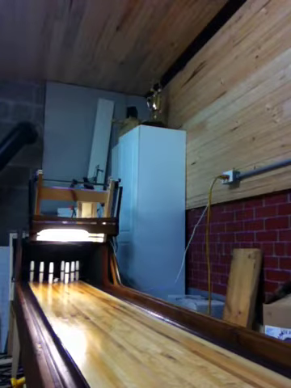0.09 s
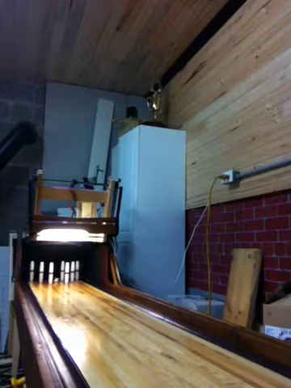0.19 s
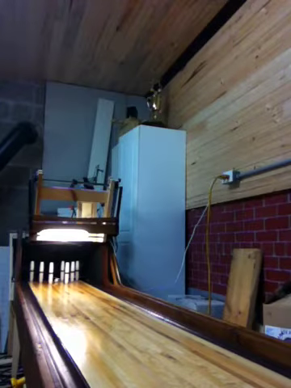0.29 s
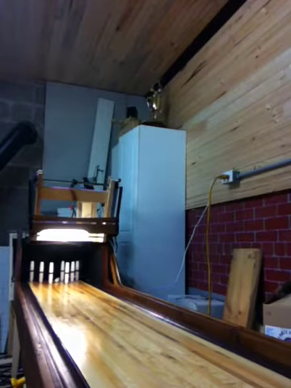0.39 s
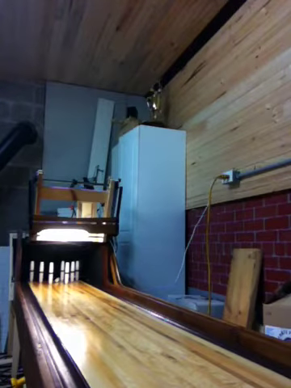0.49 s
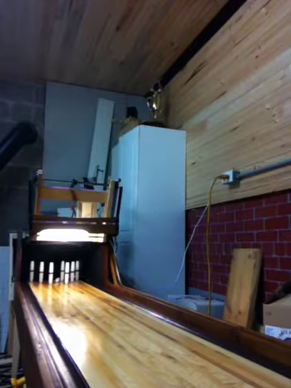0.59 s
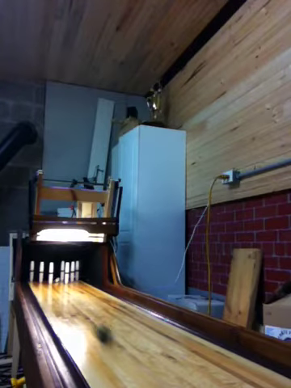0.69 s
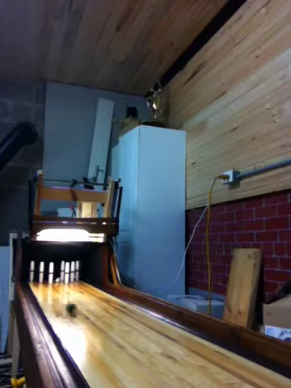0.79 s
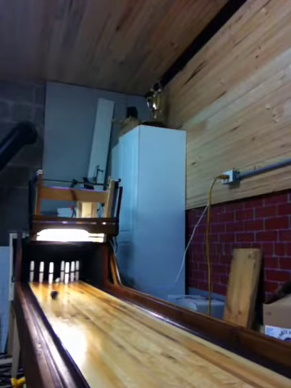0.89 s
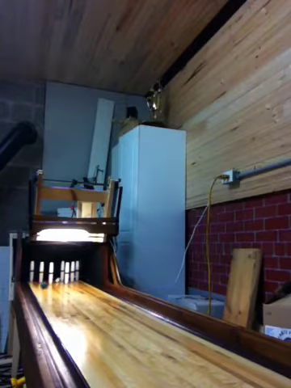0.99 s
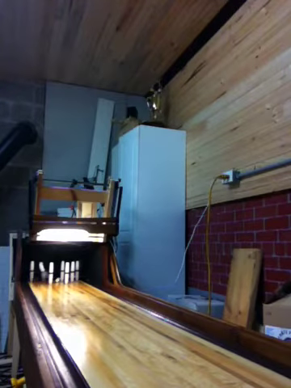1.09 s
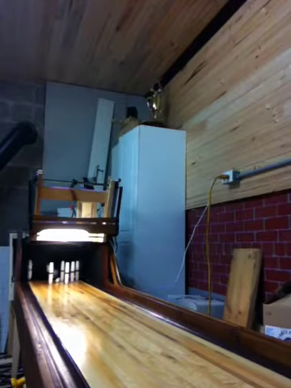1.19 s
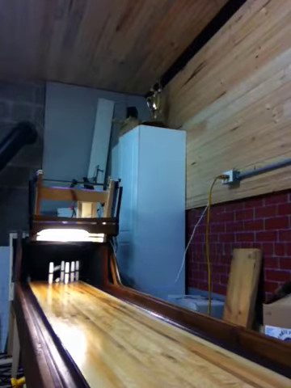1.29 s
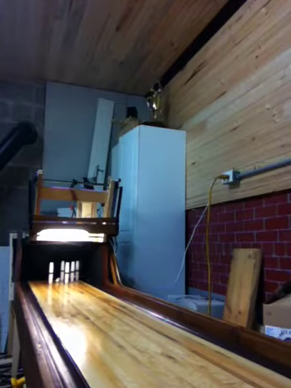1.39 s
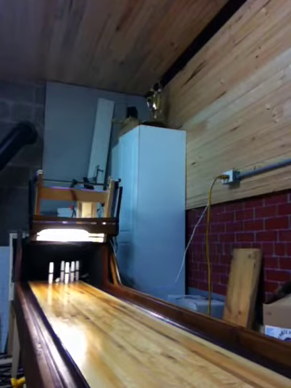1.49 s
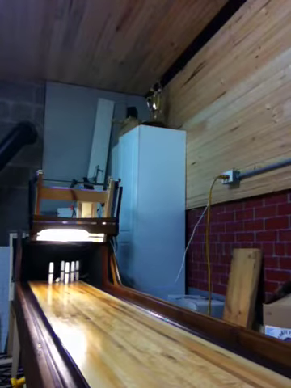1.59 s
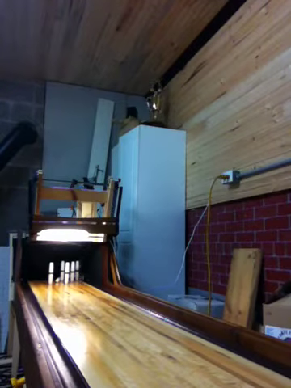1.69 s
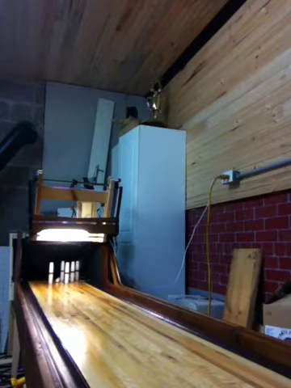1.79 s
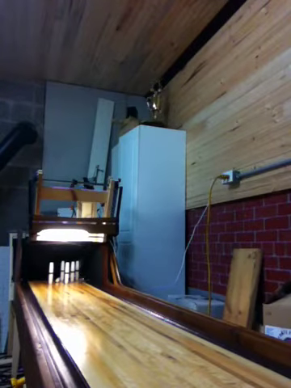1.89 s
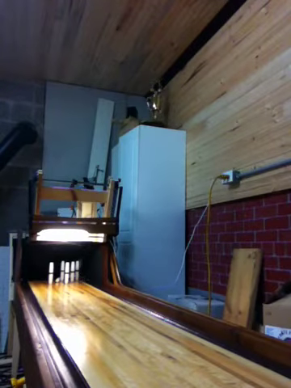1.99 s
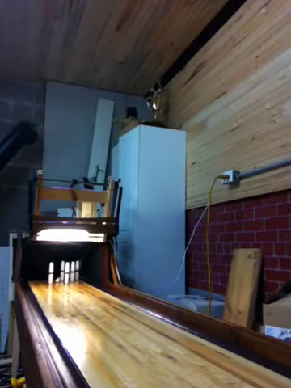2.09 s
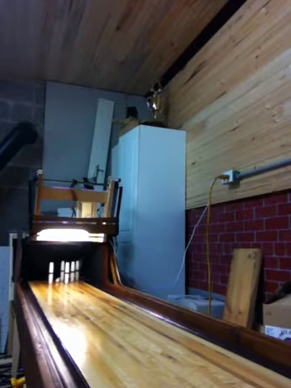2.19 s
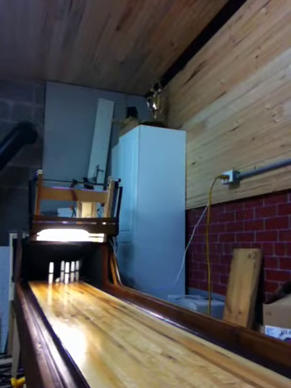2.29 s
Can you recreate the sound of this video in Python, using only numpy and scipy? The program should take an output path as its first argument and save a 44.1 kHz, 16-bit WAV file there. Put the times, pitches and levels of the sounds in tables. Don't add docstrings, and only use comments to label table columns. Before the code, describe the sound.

Mini bowling in a small wood-lined room: loud close knocks as the ball lands, a short rumbling roll, then a sharp pin crash, hollow wooden thuds and a fading rattle, with faint hiss underneath.

```python
import sys
import numpy as np
from scipy import signal
from scipy.fft import rfft, irfft
from scipy.io import wavfile
from scipy.ndimage import uniform_filter1d

SR = 44100
rng = np.random.default_rng(int(sys.argv[2]) if len(sys.argv) > 2 else 0)


def gain_from_decibels(decibels):
    exponent = np.asarray(decibels, float) / 20
    return 10 ** exponent


def master(y):
    cut = np.clip(np.atleast_2d(y).T, -1, 1)
    pcm = np.round(cut * 32767)
    wavfile.write(sys.argv[1], SR, pcm.astype(np.int16))


N = 103635

# (frequency [Hz], level [dB], t60 [s])
PIT_MODES = [(136, -15.5, 0.21), (246, -58, 0.18), (345, -8.5, 0.15), (373.4, -13.5, 0.21),
             (492, -9.5, 0.15), (578, -7, 0.17), (690, -10.5, 0.1), (743, -15.5, 0.24), (940, -18, 0.24)]


def ball():
    # (time [s], peak [dB], knock pitch [Hz], knock
    bounces = [(0.2444, -0.5, 1138, 3.47), (0.254, -13, 1460, 2.1), (0.2665, -7, 990, 1.7),
               (0.282, -14.5, 1460, 3.1), (0.291, -15.5, 1320, 2.6), (0.3429, -4, 1070, 5.3),
               (0.351, -13.5, 590, 2.5), (0.4058, -5, 1100, 1.8), (0.41, -11, 1250, 2.5),
               (0.4515, -11, 1060, 2.5), (0.49, -16, 1250, 5), (0.5165, -10, 850, 4),
               (0.5405, -16, 842, 3.5), (0.63, -13, 845, 3), (0.6495, -14, 826, 3.5), (0.56, -20, 830, 3.8),
               (0.602, -20, 1500, 3.1), (0.71, -20.5, 870, 2.5), (0.746, -37, 970, 3.9),
               (0.847, -16, 1030, 3.8), (0.858, -19.5, 1270, 8.6), (0.865, -12.5, 1200, 2.6),
               (0.882, -23.5, 980, 6.4), (0.898, -19, 1000, 2.4), (0.923, -26, 870, 3.8),
               (0.958, -24.5, 783, 8.8), (1.048, -23, 1220, 7.2), (1.066, -19.5, 1350, 7.3),
               (1.073, -16, 910, 4.5), (1.093, -12, 830, 5.9), (1.118, -14.5, 810, 5.4),
               (1.133, -14, 1110, 4.2), (1.152, -16, 1100, 5)]
    # (time [s], level [dB])
    roll_curve = [(.4, -25), (.56, -31), (.62, -31.5), (.68, -29.5), (.78, -28.5), (.87, -34.5),
                  (.95, -25.5), (1.02, -29), (1.07, -22.5), (1.17, -34), (1.29, -26)]
    # (frequency [Hz], level [dB])
    lane = [(50, -16), (100, -9), (330, -4.5), (1100, -2), (1700, -4), (3000, -18), (5000, -27.5),
            (12000, -49.5)]
    # (frequency [Hz], level [dB], t60 [s])
    lane_modes = [(96.3, -16.5, 0.38), (155.3, -26, 0.17), (200.8, -30, 0.36), (233, -28, 0.16),
                  (510, -54, 0.045), (830, -31, 0.078), (1070, -35, 0.052), (1450, -22, 0.036)]
    # (frequency [Hz], level [dB])
    rumble = [(50, -39), (100, -8), (330, -8.5), (950, 2), (1700, -8.5), (2600, -18), (5000, -29.5),
              (12000, -54)]
    board_db, board_fade_db_per_s, board_rise_s, board_s = -7, -6.5, 0.0015, 0.0088
    tick_db, tick_s = -56, 0.00032
    edge_fade_db_per_s, thump_fade_db_per_s = -0.5, -7.5

    boards, knocks, hits = np.zeros(N), np.zeros(N), np.zeros(N)
    t = np.arange(3000) / SR
    noise = rng.standard_normal((len(bounces), 2, len(t)))
    board_shape = np.minimum(t / board_rise_s, 1) * np.exp(-t / board_s)
    for (s, db, hz, cycles), (a, b) in zip(bounces, noise):
        shake = gain_from_decibels(board_db + board_fade_db_per_s * s) * colour(a * board_shape, lane)
        tick = gain_from_decibels(tick_db) * b * np.exp(-t / tick_s)
        add(boards, s, gain_from_decibels(db) * (shake + tick))
        add(knocks, s - .001, gain_from_decibels(db) * knock(hz, cycles, edge_fade_db_per_s * s))
        add(hits, s, gain_from_decibels(db + thump_fade_db_per_s * s) * np.ones(1))
    thump = signal.fftconvolve(hits, ring(lane_modes))[:N]

    size, level = bumps(roll_curve, rate=1100, spread_db=1.5)
    grain = evened(signal.fftconvolve(size, knock(970, 2.85))[:N])
    roll = 0.57 * level * (evened(colour(size, rumble)) + 0.11 * grain)
    return room(boards + thump + roll, wet_db=-0.5) + room(knocks, wet_db=-5)


def pins():
    # (time [s], peak [dB], scatter length [s], tilt [dB per octave])
    strikes = [
        (1.1675, -17.5, 0.0055, -4.5),
        (1.1712, -11, 0.0021, -2),
        (1.1740, -9.5, 0.0029, 1.5),
        (1.2010, -17, 0.0025, -4.5),
        (1.2045, -7, 0.0011, 0),
        (1.251, -44, 0.0035, 16),
    ]
    # (frequency [Hz], level [dB])
    struck = [(500, -29), (1100, -11), (1800, -3), (2500, -7.5), (6700, -9.5), (7400, -23), (10500, -48),
              (11500, -53), (15500, -77)]
    # (frequency [Hz], level [dB], t60 [s])
    struck_modes = [(1620, -27, 0.045), (2210, -15, 0.084), (3440, -10, 0.052), (4330, -6, 0.041),
                    (6920, -6, 0.2), (7240, -13, .12), (9600, -19, .15), (9740, -18, 0.12),
                    (12700, -39, .2)]
    # (time [s], peak [dB], scatter length [s], tilt [dB per octave])
    clack_events = [(1.3164, -13.5, 0.0056, 1), (1.3242, -7.5, 0.0034, -2), (1.386, -1.5, 0.0058, 2),
                    (1.409, 4, 0.0089, 6.5), (1.4177, 5, 0.0086, 5.5), (1.4377, -9, 0.0054, -8.5),
                    (1.4957, -11.5, 0.017, 3), (1.5304, -12, 0.019, 1), (1.545, -16, 0.017, -0.5),
                    (1.562, -31, 0.009, -7.5), (1.574, -17, 0.014, -1.5), (1.59, -21, 0.0063, -8),
                    (1.626, -24, 0.01, -6.5), (1.64, -22, 0.016, -3), (1.7452, -15, 0.0022, -2.5),
                    (1.7474, -8.5, 0.011, 5.5), (1.806, -26.5, 0.016, 1), (1.8367, -14.5, 0.015, 4),
                    (1.905, -24, 0.01, 1), (1.943, -20, 0.0073, 2.5), (2.0516, -29, 0.015, -5),
                    (2.0893, -31, 0.017, -3), (2.14, -29, 0.0097, -6)]
    # (frequency [Hz], level [dB])
    pin = [(88, -46.5), (150, -19), (930, 1.5), (1150, -7), (1320, 0), (5030, -12.5), (9000, -30),
           (14300, -57), (15500, -92)]
    # (frequency [Hz], level [dB], t60 [s])
    pin_modes = [(1840, -29, 0.018), (2290, 0, .04), (2910, 6, 0.028), (3840, -32, .04), (5100, -3, 0.01),
                 (5690, -8, 0.034)]
    # (time [s], peak [dB])
    clinks = [
        (1.904, -32),
        (1.91, -21),
        (1.918, -26.5),
    ]
    # (frequency [Hz], level [dB], t60 [s])
    clink_modes = [(1610, 1, 0.033), (1883, 0, 0.038), (3940, -6.5, 0.046)]
    # (time [s], level [dB])
    tumble_curve = [
        (1.36, -8.5),
        (1.45, -24.5),
        (1.6, -27.5),
        (1.72, -42),
        (1.8, -25),
        (1.97, -28.5),
        (2.03, -49),
        (2.1, -38),
        (2.4, -68),
    ]

    size, level = bumps(tumble_curve, rate=700, spread_db=2)
    box = evened(signal.fftconvolve(size, ring(PIT_MODES))[:N])
    tumble = 0.54 * level * (evened(colour(size, pin, tilt_db=-4.5)) + 0.32 * box)

    first = clacks(strikes, struck, struck_modes, ring_db=-15, rise_s=1 / SR)
    hard = clacks(clack_events, pin, pin_modes, ring_db=-16.5, rise_s=0.002)
    for s, db in clinks:
        add(hard, s, gain_from_decibels(db) * ring(clink_modes))
    return room(first, wet_db=-3.5) + room(hard + tumble, wet_db=-2.5)


def clacks(events, spectrum, body, ring_db, rise_s):
    detune = 0.0305
    flat = [(20, 0), (20000, 0)]
    out, t = np.zeros(N), np.arange(6000) / SR
    noise = rng.standard_normal((len(events), len(t)))
    tune = rng.uniform(-0.9, 1, len(events))
    for (s, db, length, tilt_db), a, d in zip(events, noise, tune):
        touch = a * np.minimum(t / rise_s, 1) * np.exp(-t / length)
        modes = ring(body, 1 + detune * d)
        rung = signal.fftconvolve(touch, modes / np.linalg.norm(modes))[:len(t)]
        clack = colour(touch, spectrum) + gain_from_decibels(ring_db) * rung
        add(out, s - .0005, gain_from_decibels(db) * colour(clack, flat, tilt_db))
    return out


def pit():
    # (time [s], peak [dB], knock pitch [Hz], boom [dB])
    thuds = [(1.251, -20.5, 1010, -8), (1.321, -8, 769, -19), (1.327, -17, 526, -13.5),
             (1.339, -14.5, 1060, -9), (1.392, -14.5, 887, -5), (1.411, -21, 556, -11),
             (1.535, -12.5, 546, -6.5), (1.57, -23, 940, -5), (1.629, -7.5, 1117, -45),
             (1.635, -7.5, 1038, -32), (1.7454, -15, 504, -12), (1.7525, -3, 925, -15.5),
             (1.764, -19.5, 833, -18), (1.806, -20, 504, 0.5), (1.836, -18.5, 476, -0.5),
             (1.945, -22.5, 670, -12), (1.962, -28.5, 690, 2), (2.051, -49, 603, -6),
             (2.068, -27, 940, -14), (2.141, -27.5, 582, -9), (2.201, -34.5, 780, -13),
             (2.28, -36.5, 596, 3)]
    # (time [s], peak [dB], pitch [Hz], length [cycles])
    hums = [(1.191, -33.5, 448, 40), (1.401, -34.5, 137.6, 20), (1.42, -20.5, 952, 39),
            (1.39, -22, 412, 11), (1.532, -14, 574.2, 18), (1.569, -25.5, 574, 30), (1.568, -22.5, 940, 34),
            (1.823, -24, 347, 9.8), (1.862, -24.5, 345, 22), (1.95, -22.5, 362, 7.6), (1.96, -36, 137, 4.8),
            (2.0, -31, 364, 11.3), (2.055, -24, 354.8, 17.7), (2.09, -26, 369, 9.4),
            (2.085, -42.5, 137, 10.6), (2.136, -36, 352, 4.9), (2.201, -34, 349, 18), (2.271, -38, 374, 14),
            (2.29, -41, 130, 5.4)]
    boom_s = 0.014
    out, shake, t = np.zeros(N), np.zeros(N), np.arange(3000) / SR
    noise = uniform_filter1d(rng.standard_normal((len(thuds), len(t))), size=20, axis=1)
    noise = noise - uniform_filter1d(noise, size=250, axis=1)
    for (s, db, hz, boom_db), a in zip(thuds, noise):
        add(out, s - .001, gain_from_decibels(db) * knock(hz, 5.74, edge_db=-0.5))
        soft = a * t * np.exp(-t / boom_s)
        add(shake, s, gain_from_decibels(db + boom_db) * soft / np.linalg.norm(soft) / 5)
    for s, db, hz, cycles in hums:
        add(out, s, gain_from_decibels(db) * knock(hz, cycles, edge_db=-60))
    boom = signal.fftconvolve(shake, ring(PIT_MODES))[:N]
    return room(out + boom, wet_db=-8)


def knock(hz, cycles, edge_db=0):
    # (ratio to the knock pitch, level [dB])
    partials = [(0.522, -13), (1.569, -8.5), (2.2, -18.5)]
    turns = np.arange(cycles * 3 / hz * SR) / SR * hz
    u = turns / cycles * 3
    tones = np.sin(2 * np.pi * turns)
    for ratio, db in partials:
        tones = tones + gain_from_decibels(db + edge_db) * np.sin(2 * np.pi * ratio * turns)
    return (u * np.exp(1 - u)) ** 2 * tones


def ring(modes, stretch=1):
    t = np.arange(SR // 3) / SR
    return sum(gain_from_decibels(db - 60 * t / t60) * np.sin(2 * np.pi * hz * stretch * t) for hz, db, t60 in modes)


def bumps(curve, rate, spread_db):
    s, db = np.transpose(curve)
    t = np.arange(N) / SR
    size = gain_from_decibels(spread_db * np.minimum(rng.exponential(1, N), 4))
    size = size * (rng.random(N) < rate / SR) * rng.choice([-1, 1], N)
    fade = np.clip(np.minimum(t - s[0], s[-1] - t) / .04, 0, 1)
    return size, gain_from_decibels(np.interp(t, s, db)) * fade


def colour(x, points, tilt_db=0):
    hz = np.abs(np.fft.fftfreq(2048, 1 / SR))
    octaves = np.log2(np.maximum(hz, 100) / 2000)
    log = np.log(gain_from_decibels(read(points, hz) + tilt_db * octaves))
    taps = np.fft.ifft(np.exp(log - 1j * signal.hilbert(log).imag)).real
    return signal.fftconvolve(x, taps[:1024] / np.linalg.norm(taps))[:len(x)]


def read(points, hz):
    f, value = np.transpose(points)
    return np.interp(np.log(hz + 1), np.log(f + 1), value)


def evened(x):
    return x / np.sqrt(np.mean(x ** 2) + 1e-20)


def add(mix, s, sound):
    part = mix[round(s * SR):][:len(sound)]
    part += sound[:len(part)]


def room(x, wet_db):
    # (frequency [Hz], t60 [s])
    decay = [(100, 0.23), (500, 0.59), (1500, 0.49), (4000, 0.46), (10000, 0.6)]
    gap_s = .006
    taps = np.zeros(SR)
    at = np.arange(0, SR - 20, 20) + rng.integers(0, 20, (SR - 1) // 20)
    taps[at] = rng.choice([-1., 1.], len(at))
    hz, t, z = signal.stft(taps, SR, nperseg=256)
    tail = signal.istft(z * gain_from_decibels(-60 * t / read(decay, hz)[:, None]), SR, nperseg=256)[1]
    tail = np.r_[np.zeros(round(gap_s * SR)), tail / np.linalg.norm(tail)]
    return x + gain_from_decibels(wet_db) * signal.fftconvolve(x, tail)[:N]


def air():
    # (frequency [Hz], level [dB])
    hiss = [(12, -45), (20, -32), (70, -5), (202, -8), (291, -6), (1080, -21.5), (6420, -23.5),
            (9480, -27.5), (15700, -35)]
    hz = np.fft.rfftfreq(N, 1 / SR)
    noise = rfft(rng.standard_normal(N)) * gain_from_decibels(read(hiss, hz))
    return gain_from_decibels(-59) * evened(irfft(noise, N))


def scene():
    return (ball() + pins() + pit())[None]


def top_cut(x):
    return signal.sosfilt(signal.butter(12, 15810, fs=SR, output="sos"), x)


def record(dry):
    limit, push_db, push_hz = .71, -28, 30
    low_cut = signal.butter(6, 123.5, "high", fs=SR, output="sos")
    cut = signal.sosfilt(low_cut, dry) + air()
    push_band = signal.butter(2, [push_hz / 2, push_hz], "band", fs=SR, output="sos")
    push = signal.sosfilt(push_band, cut ** 2)
    drive = cut / limit
    x = limit * np.tanh(drive * (1 + drive ** 2 / 3)) + gain_from_decibels(push_db) * push
    edge = signal.firwin(511, 15750, window=("kaiser", 9), fs=SR)
    return top_cut(signal.oaconvolve(x, edge[None], "same"))


dry = scene()
out = record(dry)
master(out)
```